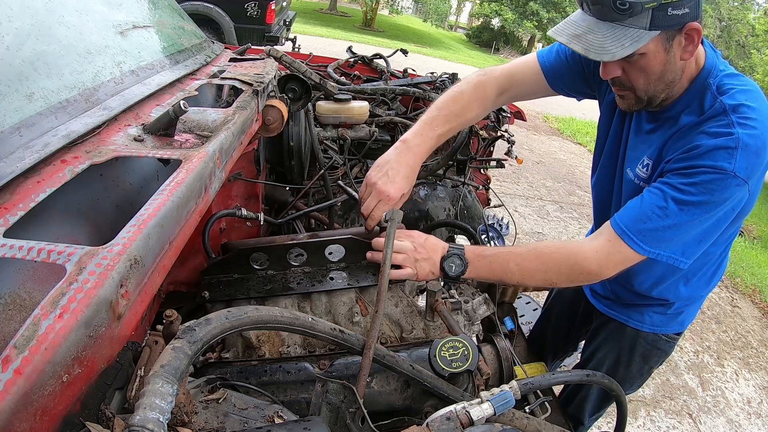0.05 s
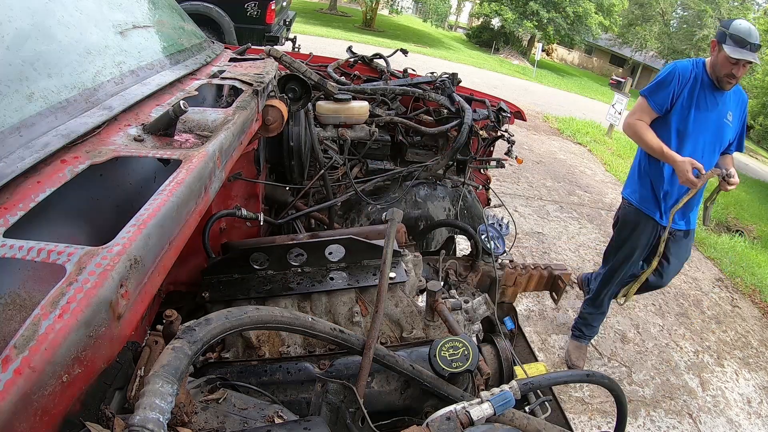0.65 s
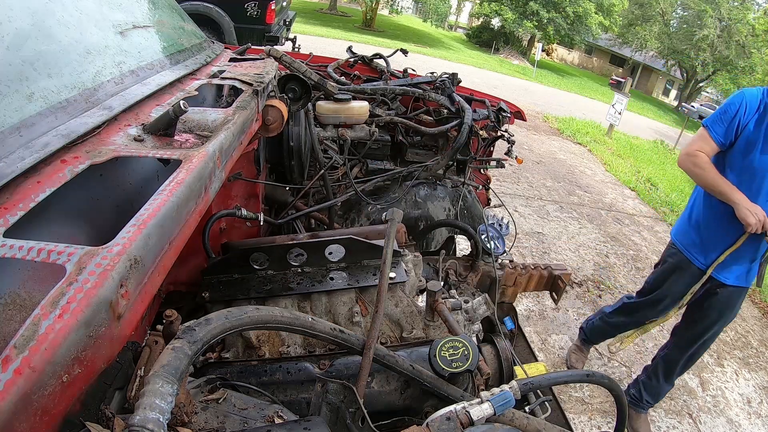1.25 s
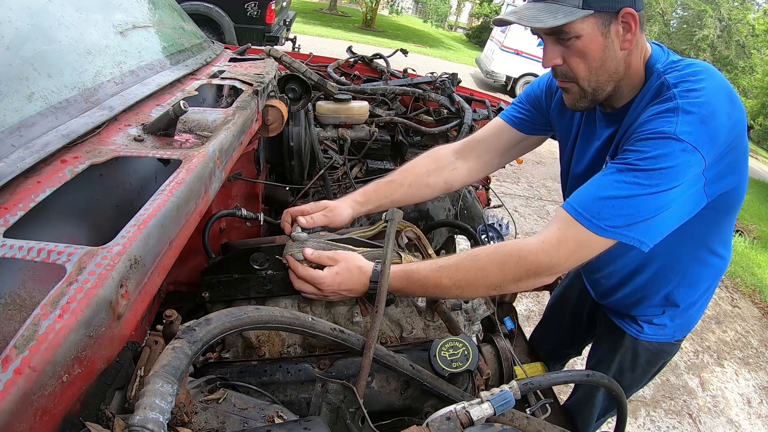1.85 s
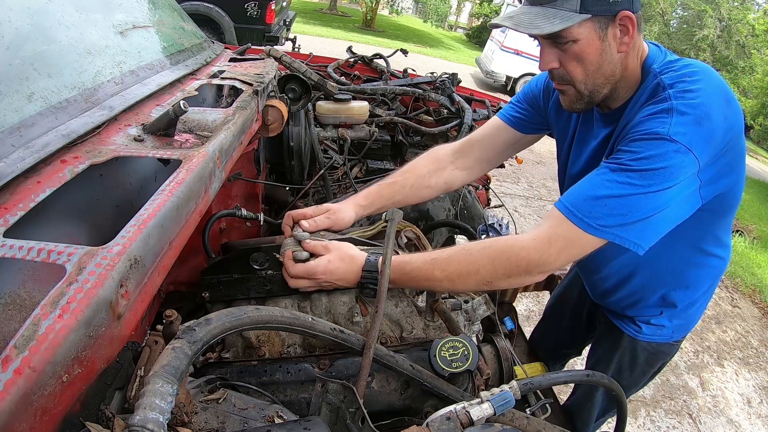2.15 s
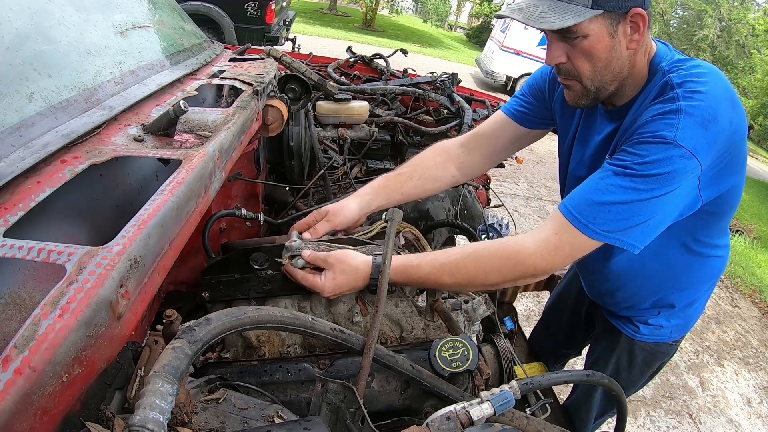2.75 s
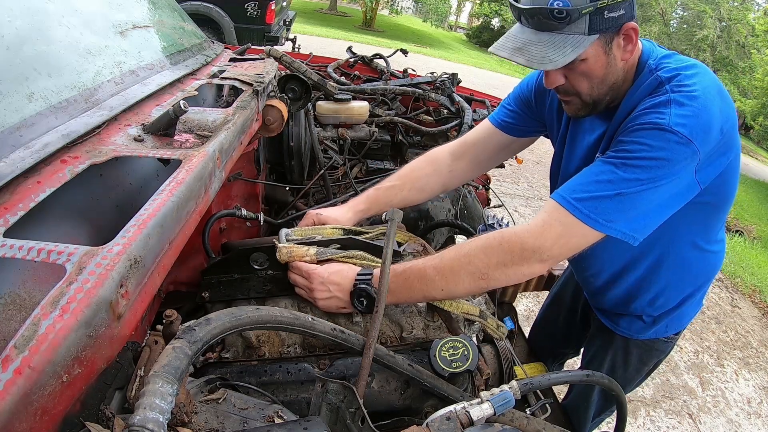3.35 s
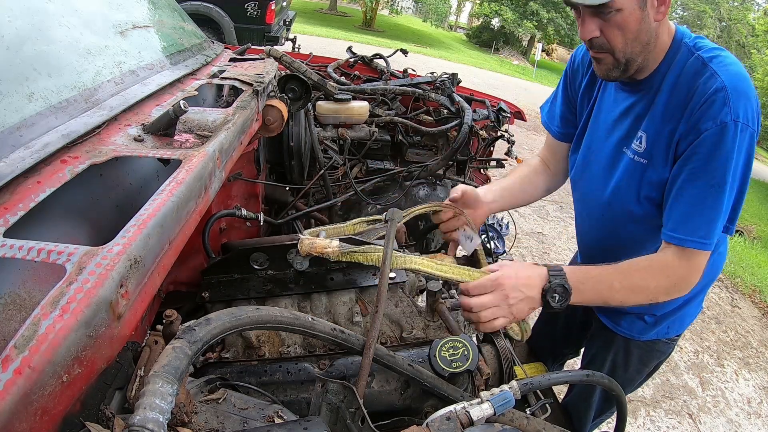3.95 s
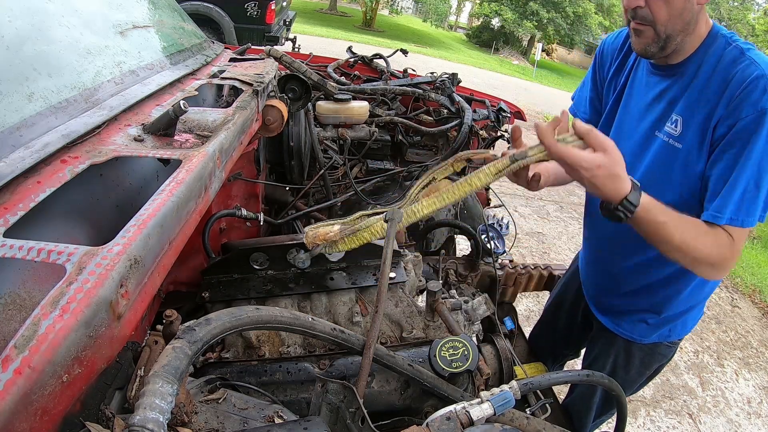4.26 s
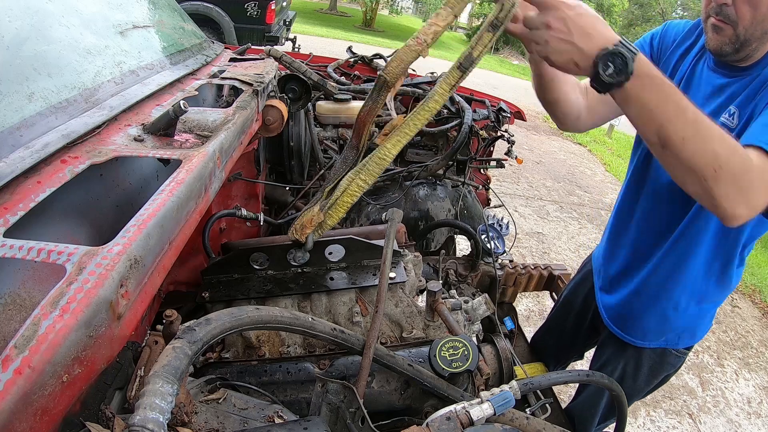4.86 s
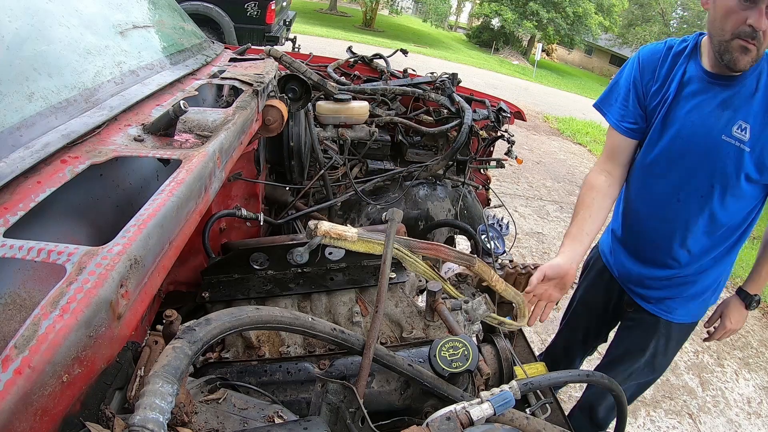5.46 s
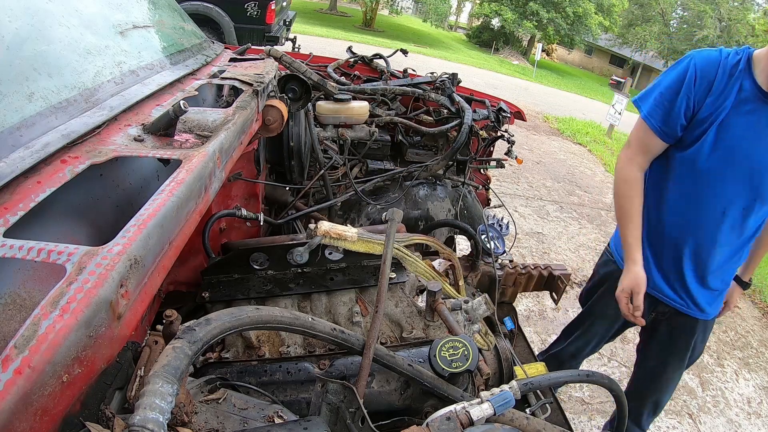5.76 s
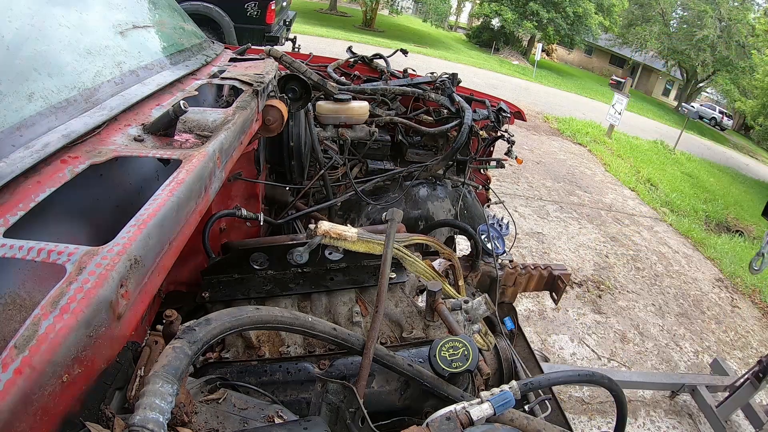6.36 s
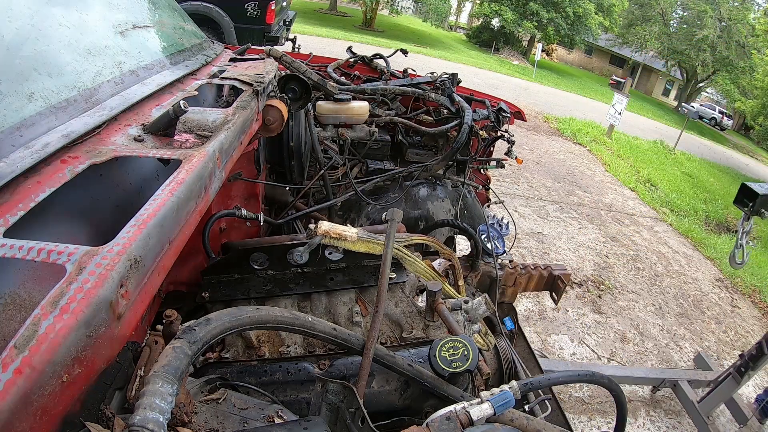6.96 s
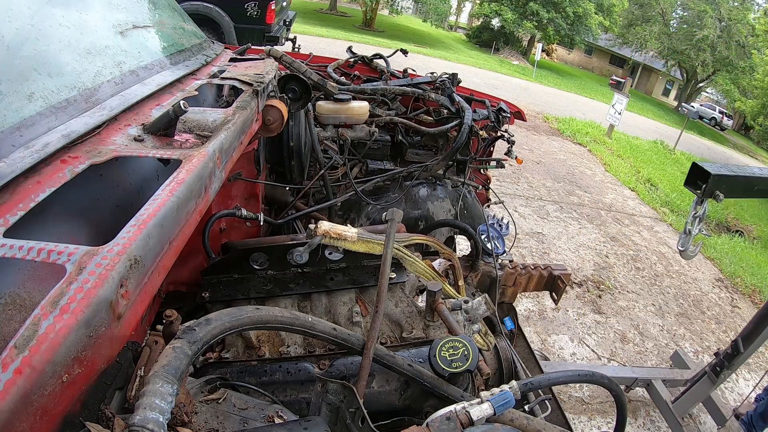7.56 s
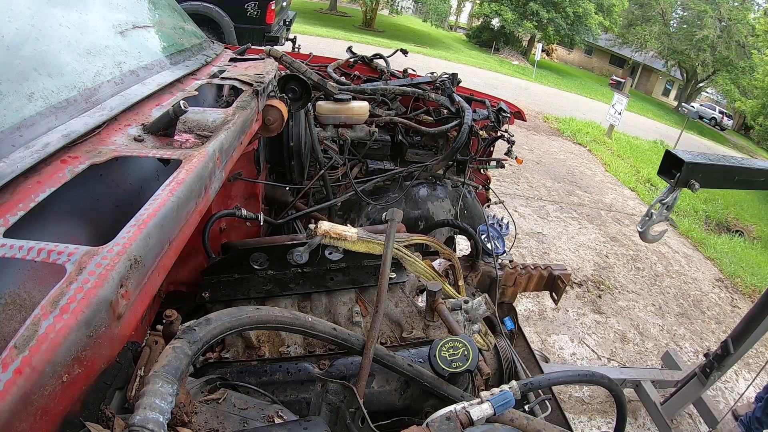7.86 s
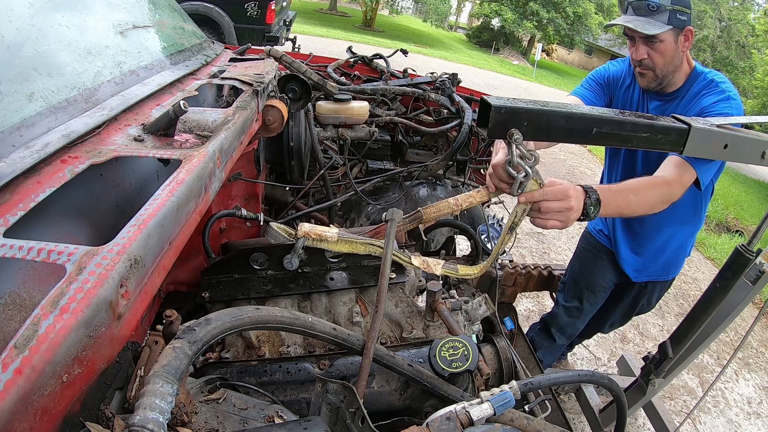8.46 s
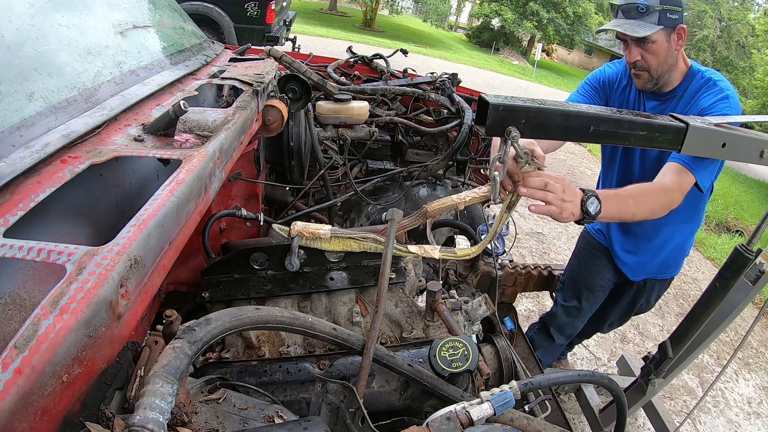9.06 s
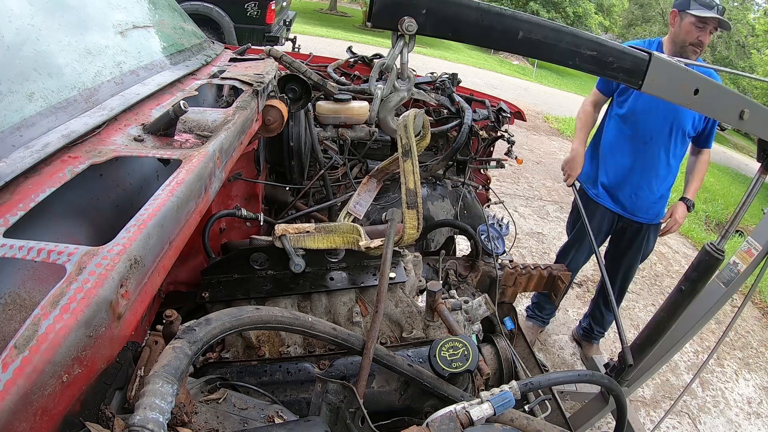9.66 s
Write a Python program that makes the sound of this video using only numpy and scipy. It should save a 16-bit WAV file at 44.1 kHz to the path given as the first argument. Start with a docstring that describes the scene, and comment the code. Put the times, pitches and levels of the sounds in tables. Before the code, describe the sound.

Outdoors, wind nudges the microphone and a motor drones far off. A steel bar clanks once. A stiff lifting strap rustles and snaps as it is threaded round a truck engine, its steel end knocking dully on the block. Then an engine hoist rolls over gritty concrete, frame rattling and chain jingling. It stops, and a shackle is hooked on with a few light clanks and scrapes.

```python
"""Outdoors, a motor drones far off and wind nudges the microphone. A steel bar clanks once. A lifting strap is
threaded round a truck engine: its webbing rustles, and a chain hook knocks on the block. From about 6.4 s the
sound of an engine hoist rolling over gritty concrete sets in abruptly, its frame rattling and its chain
jingling. It breaks off abruptly at about 8.4 s, and a shackle is hooked onto its boom with a few clanks and
scrapes."""
import sys
import numpy as np
from scipy import signal
from scipy.fft import rfft, irfft, next_fast_len
from scipy.io import wavfile
from scipy.ndimage import uniform_filter1d

SR = 44100
rng = np.random.default_rng(int(sys.argv[2]) if len(sys.argv) > 2 else 0)


def file_out(sig):
    """Save sig as 16-bit WAV at sys.argv[1]."""
    # one column per channel
    cols = np.atleast_2d(sig).T
    # limit, then scale
    lim = np.clip(cols, -1, 1)
    pcm = np.round(lim * 32767).astype(np.int16)
    wavfile.write(sys.argv[1], SR, pcm)


N = 427769
TIME = np.arange(N) / SR


def from_db(db):
    """Turn decibels into a gain."""
    return 10 ** (np.asarray(db) / 20)


def unit_level(x):
    """Scale a signal to an average (rms) level of 1."""
    return x / np.sqrt(np.mean(x ** 2) + 1e-20)


def in_time(rows):
    """Each column glides from one row's value to the next."""
    times, *columns = np.transpose(rows)
    return [np.interp(TIME, times, c) for c in columns]


def in_steps(rows, change_s=0.02):
    """Each column holds its value, then moves quickly to the next row's."""
    times, *columns = np.transpose(rows)
    row = np.maximum(np.searchsorted(times, TIME, side="right") - 1, 0)
    return [uniform_filter1d(c[row], round(change_s * SR)) for c in columns]


def swells(rows, attack_s, release_s):
    """A gain that swells up to each row's time, holds for its length and dies away."""
    power = 0
    for s, length, db in rows:
        early, late = np.maximum(s - TIME, 0), np.maximum(TIME - s - length, 0)
        fade = np.minimum((early / attack_s) ** 2 + late / release_s, 20)
        power = power + from_db(db) ** 2 * np.exp(-2 * fade)
    return np.sqrt(power)


def level_at(spectrum, hz):
    """Look up a spectrum's level in dB at a frequency."""
    points_hz, points_db = np.transpose(spectrum)
    return np.interp(np.log(hz + 1e-6), np.log(points_hz), points_db)


def colour(x, spectrum):
    """Shape a signal's lows and highs; the result has level 1."""
    size = next_fast_len(len(x))
    hz = np.arange(size // 2 + 1) * SR / size
    return unit_level(irfft(rfft(x, size) * from_db(level_at(spectrum, hz)), size)[:len(x)])


def split(x):
    """Cut a signal into half-octave bands; return their centres and the bands."""
    size = next_fast_len(len(x))
    centres = 180 * 2 ** (np.arange(14)[:, None] / 2)
    hz = np.clip(np.arange(size // 2 + 1) * SR / size, centres[0], centres[-1])
    shares = np.maximum(1 - 2 * np.abs(np.log2(hz / centres)), 0)
    return centres, irfft(rfft(x, size) * shares, size)[:, :len(x)]


def noise(spectrum):
    """Steady noise with the given spectrum."""
    return colour(rng.standard_normal(N), spectrum)


def drift(per_s):
    """A random wobble that changes about per_s times a second."""
    knots = rng.standard_normal(4000)
    return unit_level(np.interp(TIME * per_s, np.arange(len(knots)), knots))


def grains(per_s, spread_db):
    """Tiny slips at random moments, some larger than the rest."""
    sizes = from_db(spread_db * np.minimum(rng.exponential(1, N), 4))
    return unit_level(sizes * rng.choice([-1, 1], N) * (rng.random(N) < per_s / SR))


def ring(force, tones, wander_db=0):
    """A force rings an object's tones, each fading 60 dB in its ring time (t60)."""
    out = 0
    for hz, db, t60 in tones:
        decay, angle = from_db(-60 / (t60 * SR)), 2 * np.pi * hz / SR
        # as the contact wanders, each tone comes and goes
        drive = force * from_db(wander_db * drift(18)) if wander_db else force
        feedback = [1, -2 * decay * np.cos(angle), decay ** 2]
        out = out + signal.lfilter([0, from_db(db) * np.sin(angle)], feedback, drive)
    return unit_level(out)


def blows(hits, tones, crack, crack_db, crack_t60, damping, rise_s, scatter_db=1.5, detune=0.0013):
    """Each blow rings the tones over a crack: a burst of dense overtones whose treble dies first."""
    t = np.arange(SR // 2) / SR
    hz, tone_db, t60 = np.transpose(tones)[:, :, None]
    centres, bands = split(colour(rng.standard_normal(2 * SR), crack))
    band_t60 = crack_t60 * (centres / 2000) ** -damping
    band_fade = from_db(crack_db - 60 * t / band_t60)
    tone_fade = from_db(tone_db - 60 * t / t60) / np.linalg.norm(from_db(tone_db))
    out = np.zeros(N + len(t))
    for s, peak_db, *hardness in hits:
        tilt = hardness[0] if hardness else 0  # harder blows are brighter
        strength = from_db(scatter_db * rng.standard_normal(hz.shape) + tilt * np.log2(hz / hz.mean()))
        # parts pressing on each other pull the pitches slightly
        pitch = hz * (1 + detune * rng.standard_normal(hz.shape))
        ringing = strength * tone_fade * np.sin(2 * np.pi * (pitch * t + rng.random(hz.shape)))
        start = rng.integers(len(t), SR)
        burst = bands[:, start:start + len(t)] * band_fade * from_db(tilt * np.log2(centres / hz.mean()))
        blow = (ringing.sum(axis=0) + burst.sum(axis=0)) * (1 - np.exp(-t / rise_s))
        at = round(s * SR)
        out[at:at + len(t)] += blow * from_db(peak_db) / np.abs(blow).max()
    return out[:N]


def hum(speed, harmonics, waver, flutter_db):
    """A motor's tones sit on whole multiples of its wavering speed."""
    turns = np.cumsum(speed * (1 + waver * drift(14))) / SR
    out = 0
    for multiple, db in harmonics:
        gain = from_db(db + flutter_db * drift(11))
        out = out + gain * np.sin(2 * np.pi * (multiple * turns + rng.random()))
    return unit_level(out)


# the background, step by step: (time [s], motor speed [turns/s], motor [dB], hush [dB], wind [dB])
SURROUNDINGS = [(0, 32, -55.5, -56.5, -51.5), (.457, 29.2, -60.5, -57.5, -24.5),
                (1.858, 28.4, -40, -53.5, -27), (3.0, 30.5, -64, -52.5, -38), (4.75, 30.1, -64, -56, -41),
                (6.06, 30.2, -59, -53.5, -67), (8.364, 30.8, -55.5, -53, -51.5)]
# spectra of the hush, the slow wind and the puffs: (frequency [Hz], level [dB])
HUSH = [(24, -24), (40, -8), (85, -13.5), (124, -10.5), (283, -23.5), (433, -30), (1070, -31),
        (1410, -32.5), (2000, -35), (2260, -36.5), (2630, -37), (16000, -52)]
GUSTS = [(2, -1), (5, 2), (10, -11), (20, -22), (40, -30.5), (80, -60), (200, -83.5)]
PUFF_RUMBLE = [(8, 3), (24, 10), (45, -11), (70, -8), (110, -28), (250, -76)]
# puffs of wind: (time [s], length [s], level [dB])
PUFFS = [(0.645, 0.07, -34), (0.9, 0.054, -38)]
# two soft, low pops where the background changes abruptly: (time [s], level [dB])
POPS = [(0.4567, -22), (1.858, -25)]


def open_air():
    """Over an outdoor hush, wind presses on the microphone; two soft, low pops are heard."""
    _, _, hush_db, wind_db = in_steps(SURROUNDINGS)
    pops = sum(from_db(db) * (TIME >= s) * np.exp(-np.abs(TIME - s) / 0.0061) for s, db in POPS)
    puffs = noise(PUFF_RUMBLE) * swells(PUFFS, attack_s=0.033, release_s=0.05)
    return from_db(hush_db) * noise(HUSH) + from_db(wind_db) * noise(GUSTS) + puffs + pops


# the motor's tones: (multiple of its speed, level [dB])
MOTOR_TONES = [(2, -7), (3, -4.5), (4, 1.5), (5, -16), (7, -15), (11, -13), (21, -24), (22, -23.5)]
# its rushing noise: (frequency [Hz], level [dB])
MOTOR_RUSH = [(29, -43), (50, -11), (117, -12), (169, -11), (279, -16.5), (320, -11.5), (376, -21),
              (609, -24), (766, -27.5), (2500, -35.5), (2930, -30), (3400, -34.5), (12000, -57),
              (15600, -78.5)]


def far_motor():
    """A far motor hums, with a rush that follows its level."""
    speed, level_db, _, _ = in_steps(SURROUNDINGS)
    tones = hum(speed, MOTOR_TONES, waver=0.00594, flutter_db=0.5)
    return from_db(level_db) * (tones + from_db(-9.5) * noise(MOTOR_RUSH))


# the sinking drone: (time [s], pitch [Hz], level [dB])
DRONE = [(2.98, 81, -84), (3.01, 80.8, -53), (3.55, 80.5, -53.5), (3.95, 70.5, -53), (4.55, 70.8, -53),
         (5.0, 60.8, -67), (5.5, 59.6, -72)]
# its tones: (multiple of its pitch, level [dB])
DRONE_TONES = [(1, -3.5), (2, -1), (4, -9), (5, -10)]
# what the exhaust pipe lets through: (frequency [Hz], level [dB])
EXHAUST = [(70, 1), (145, 0), (180, -16), (280, -11), (325, -0.5), (352, 0.5), (390, -12), (600, -22)]


def road_drone():
    """A drone from the road sinks in pitch, coloured by an exhaust pipe."""
    hz, level_db = in_time(DRONE)
    return from_db(level_db) * colour(hum(hz, DRONE_TONES, waver=0.00527, flutter_db=3.5), EXHAUST)


# pulls through the hands: (time [s], length [s], level [dB])
PULLS = [(1.1, 0.11, -65.5), (2.118, 0.03, -55), (2.26, 0.13, -64), (3.36, 0.065, -63), (3.835, 0.025, -60),
         (3.955, 0.038, -54), (4.22, 0.2, -59.5), (5.215, 0.026, -61)]
# snags: (time [s], level [dB], brightness [dB/octave])
SNAGS = [(1.013, -46, -1), (1.099, -46.5, -4.5), (1.446, -44, 11), (1.715, -45.5, -4), (1.961, -41.5, -3),
         (2.116, -36, -5), (2.233, -36.5, -3), (2.992, -40.5, -7), (3.431, -40.5, 7), (3.926, -35.5, 3.5),
         (3.968, -33.5, 2.5), (4.228, -38, 3), (4.306, -34.5, -3), (4.477, -38, 4.5), (4.787, -40, 10),
         (8.731, -37.5, 1), (9.595, -43.5, 12), (9.665, -44, 9)]
# the webbing's rasp: (frequency [Hz], level [dB])
WEBBING = [(600, -14), (1800, -4), (3800, 4), (6000, -3), (8500, -1), (11000, -9.5), (16000, -14.5)]
# taps of the buckle: (time [s], relative level [dB])
BUCKLE_HITS = [(0.4723, -42), (0.4984, -36), (0.5444, -45.5), (1.715, -52)]
# its tones: (pitch [Hz], level [dB], ring time [s])
BUCKLE = [(4820, 2.5, 0.078), (5660, 5, 0.062), (6700, 5, 0.079), (12360, -10, 0.084)]


def strap():
    """Stiff webbing rasps with each pull and snaps where it snags; its buckle tinkles."""
    pulling = swells(PULLS, attack_s=0.015, release_s=0.026)
    fibres = grains(per_s=900, spread_db=4.0)
    rasp = colour(fibres, WEBBING) * pulling * from_db(3.1 * drift(60))
    snags = blows(SNAGS, BUCKLE, WEBBING, crack_db=12, crack_t60=0.035, damping=0.33, rise_s=0.0001)
    buckle = blows(BUCKLE_HITS, BUCKLE, WEBBING,
                   crack_db=-2, crack_t60=0.021, damping=0.2, rise_s=0.00052)
    return rasp + snags + from_db(0.7) * buckle


# blows on bar and block: (time [s], level [dB], brightness [dB/octave])
BAR_HITS = [(0.372, -21, 0.0)]
BLOCK_HITS = [(2.690, -27.5, -0.5), (2.839, -35, 3), (3.613, -42, -3), (3.638, -37.5, 1),
              (4.045, -18.5, 1.5), (4.185, -42, -3), (4.480, -47.5, -7), (4.820, -39.5, -4),
              (4.978, -28.5, -2.5), (5.098, -39.5, -6.5), (5.245, -20, -2.5), (5.783, -47.5, 5)]
# their tones: (pitch [Hz], level [dB], ring time [s])
BAR = [(1250, -2, 0.13), (1460, -10, 0.14), (1640, 2, 0.2), (1930, -6, 0.2), (2150, -1, .06),
       (2300, -2, 0.092), (3700, 1, 0.065), (3900, 2, 0.067), (4360, -1, 0.093), (6140, -12, 0.12),
       (7500, -13, 0.18), (7790, -3, 0.076)]
BLOCK = [(374, -17.5, 0.39), (680, -7, 0.11), (893, 8, 0.07), (1010, -17, 0.37), (1144, -11.5, 0.18),
         (1297, -2.5, .15), (1500, -10, 0.069), (1707, 3, 0.067), (1862, 4, 0.046), (1975, -6, .08),
         (2070, -14, 0.17), (2255, -6.5, 0.08), (2680, -13, 0.066), (2990, -5, 0.079), (3550, -15, 0.065),
         (3800, -14, 0.073), (10860, -34, 0.091)]
# their cracks: (frequency [Hz], level [dB])
BAR_CRACK = [(180, -51), (300, -16), (433, -21), (828, -19), (1500, -6), (2200, -5.5), (4160, -16),
             (4750, -21), (7570, -18), (16000, -46)]
BLOCK_CRACK = [(200, -31), (380, -0.5), (520, -18), (880, 0.5), (1900, -1.5), (2600, -8), (4000, -19),
               (7500, -20), (15000, -49)]


def engine_knocks():
    """A steel bar clanks once; a chain hook knocks dully on the heavy engine block."""
    bar = blows(BAR_HITS, BAR, BAR_CRACK, crack_db=1, crack_t60=0.06, damping=0.18, rise_s=0.0004)
    block = blows(BLOCK_HITS, BLOCK, BLOCK_CRACK,
                  crack_db=-10.5, crack_t60=0.091, damping=0.31, rise_s=0.00049)
    return bar + block


# clinks of chain, hook and shackle: (time [s], relative level [dB])
CHAIN_HITS = [(6.2996, -50), (6.3555, -49), (6.4268, -44), (6.484, -39), (6.4931, -31), (6.5585, -31),
              (6.5805, -20.5), (6.592, -29), (6.6025, -24.5), (6.614, -28), (6.6605, -32.5), (6.833, -48),
              (7.1285, -28)]
HOOK_HITS = [(7.217, -29), (7.6036, -19.5), (8.0103, -17.5), (8.0408, -22.5), (8.3405, -27)]
SHACKLE_HITS = [(6.702, -48), (7.099, -48), (7.415, -45), (8.2117, -44), (8.7329, -47), (8.8212, -24),
                (8.8931, -38), (8.9391, -48)]
# their tones: (pitch [Hz], level [dB], ring time [s])
CHAIN = [(8930, -9, .09), (9030, -8, .09), (9600, -9, .06), (9760, -5, .07), (9850, -1, .08),
         (12356, -0.5, .07), (14750, -18, .05)]
HOOK = [(8000, -8, .05), (8856, -3, .06), (9300, -9, .04), (10060, -14, .04), (11230, 0, .064),
        (11340, -3, .07), (12560, -9, .06), (13780, -8, .036), (14140, -13, .06)]
SHACKLE = [(11540, 0, .13), (11610, -4, .13), (11980, -12, .1), (12150, -6, .13), (12356, -17, .1),
           (12780, -12, .16)]
# the crack they share: (frequency [Hz], level [dB])
LINK_CRACK = [(1000, -6), (2500, -5), (6000, -6.5), (12000, -4), (16000, -4)]
# the whole chain shakes: (time [s], length [s], relative level [dB])
CHAIN_SHAKES = [(6.545, 0.074, -44.5)]


def lifting_tackle():
    """Chain, hook and shackle are small, hard steel parts, so they ring very high."""
    chain = blows(CHAIN_HITS, CHAIN, LINK_CRACK,
                  crack_db=-5.5, crack_t60=0.032, damping=0.26, rise_s=0.00074, scatter_db=1)
    links = grains(per_s=970, spread_db=5.5) * swells(CHAIN_SHAKES, attack_s=0.022, release_s=0.064)
    shaking = np.std(links) * (ring(links, CHAIN, wander_db=4) + from_db(-5) * colour(links, LINK_CRACK))
    hook = blows(HOOK_HITS, HOOK, LINK_CRACK, crack_db=-9, crack_t60=0.035, damping=0.27, rise_s=0.00095)
    shackle = blows(SHACKLE_HITS, SHACKLE, LINK_CRACK,
                    crack_db=-11, crack_t60=0.059, damping=0.19, rise_s=0.00034)
    return from_db(-0.5) * chain + shaking + from_db(-2) * hook + from_db(3) * shackle


# blows on the boom: (time [s], level [dB], brightness [dB/octave])
BOOM_HITS = [(8.408, -29.5, 4.5), (8.420, -29, 5), (8.750, -35.5, -2.5), (8.881, -32, -0.5),
             (8.945, -42, 3), (9.163, -37, -2.2), (9.226, -42.5, -3.5), (9.591, -44.5, -4),
             (9.648, -44, -3)]
# its tones: (pitch [Hz], level [dB], ring time [s])
BOOM = [(760, -12, 0.12), (865, -7.5, 0.17), (1413, -0.5, 0.18), (1694, -4, 0.061), (2222, -1.5, 0.18),
        (2307, -3, 0.17), (2880, -1.5, 0.16), (3156, -2.5, 0.15), (3410, -7, 0.089), (3635, -5, 0.13),
        (4300, -17, 0.11), (4870, -7, 0.073)]
# its crack and scrape: (frequency [Hz], level [dB])
BOOM_CRACK = [(500, -12), (1300, -3), (2700, -1), (4500, -4.5), (7000, -13.5), (14000, -32)]
# scrapes: (time [s], length [s], level [dB])
SCRAPES = [(8.665, 0.035, -59.5), (8.755, 0.025, -55.5), (8.83, 0.07, -55), (8.95, 0.027, -57)]


def boom():
    """The hoist's lifting arm clanks, and something scrapes briefly against it."""
    clanks = blows(BOOM_HITS, BOOM, BOOM_CRACK, crack_db=-3.5, crack_t60=0.11,
                   damping=0.061, rise_s=0.0007, scatter_db=3.5, detune=0.0057)
    slips = grains(per_s=1500, spread_db=3.5)
    return clanks + colour(slips, BOOM_CRACK) * swells(SCRAPES, attack_s=0.028, release_s=0.024)


# a wheel swivels: (time [s], length [s], level [dB])
SWIVELS = [(6.548, 0.077, -34.5), (6.838, .01, -49), (8.005, 0.023, -40.5), (8.32, 0.023, -39)]
# spectra of crushing, swivelling and rolling: (frequency [Hz], level [dB])
GRIT = [(3000, -4), (6000, 7), (8500, 10.5), (10500, 3), (13500, -2), (16000, -10)]
GRIND = [(150, -21), (340, 4.5), (520, -11.5), (800, -9), (1250, 2), (1700, -2.5), (2500, -10), (5000, -26),
         (12000, -52)]
RUMBLE = [(25, -12), (70, 1), (200, -4.5), (350, -10), (700, -51)]


def wheels(grit_gain, extra_push_db):
    """Steel wheels crush grit, grind dully as they are dragged round, and rumble."""
    grit = colour(grains(per_s=4000, spread_db=1.5), GRIT) * grit_gain
    swivelling = swells(SWIVELS, attack_s=0.018, release_s=0.038)
    grinding = colour(grains(per_s=1200, spread_db=1.0), GRIND) * swivelling
    rumble = noise(RUMBLE) * from_db(-47 + 0.46 * extra_push_db)
    return grit + grinding + rumble


# the rattle of loose parts: (frequency [Hz], level [dB])
RATTLE = [(100, -31), (220, -12), (370, 3.5), (520, 0), (760, 6), (1080, -3.5), (1400, 1.5), (3000, 1),
          (5000, -0.5), (6200, -7.5), (8800, -17), (11000, -31), (16000, -46)]


def clatter(per_s, t60, parts=28):
    """Many loose parts ping, each at its own pitch and its own moments."""
    count = round(per_s * N / SR)
    out = 0
    for hz in np.geomspace(330, 7000, parts) * rng.uniform(0.95, 1.05, parts):
        taps = np.zeros(N)
        taps[rng.integers(0, N, count)] = rng.exponential(1, count)
        gain = from_db(level_at(RATTLE, hz)) * np.sqrt(hz)  # higher bands hold more parts
        out = out + gain * ring(taps + 1e-18, [(hz, 0, t60)])
    return unit_level(out)


# clanks of the joints: (time [s], level [dB], brightness [dB/octave])
FRAME_HITS = [(6.4515, -36, 2), (6.464, -29.5, 5), (6.537, -26, -7.5), (6.693, -33.5, 4),
              (6.779, -32.5, -6), (6.8215, -28, 1), (6.941, -29.5, 1), (6.983, -23.5, 4.5),
              (7.0785, -31, -3), (7.1085, -26.5, 6), (7.184, -20, -3), (7.206, -19.5, 3), (7.272, -21, 4),
              (7.4225, -22, -1), (7.4756, -24, -2.5), (7.515, -21.5, 3.5), (7.604, -17.5, -1.5),
              (7.657, -18, 1), (7.6956, -12, 4), (7.831, -25.5, -2), (7.998, -26, -2.5), (8.1026, -29.5, 0),
              (8.170, -18.5, -0.5), (8.321, -20, -0.5)]
# tones of the frame and a loose brace: (pitch [Hz], level [dB], ring time [s])
FRAME = [(738, -7, .06), (882, -7, .1), (1662, -2, .25), (1733, 4, .15), (2082, -1, .14), (2897, -2, .16),
         (3250, 1, .12), (4025, -1, .2), (4277, 0, .16), (4302, 1, .16), (4639, -3, .12), (5177, 2, .07),
         (5676, -8, .12), (6660, -7, .1)]
BRACE = [(1754, 0, 0.24)]
# the brace rings on: (time [s], length [s], level [dB])
BRACE_BUZZ = [(6.97, 0.56, -44.5)]
JOLT_ATTACK_S, JOLT_RELEASE_S = 0.031, 0.049  # the frame takes up the shaking, then settles


def frame(rattle_db, extra_push_db, bumps_db):
    """The tube frame rattles, brighter the harder it shakes; its joints clank and a brace rings."""
    shaking = grains(per_s=2600, spread_db=0.7)
    pings = from_db(-3) * clatter(per_s=55, t60=0.06)
    tubes = from_db(-5.5) * ring(shaking, FRAME, wander_db=2.5)
    centres, bands = split(colour(shaking, RATTLE) + tubes + pings)
    # the joints touch now here, now there, so each band swells on its own
    shifting_db = 1.6 * np.array([drift(28) for _ in centres])
    brightness = 0.21 * (rattle_db + 30.5) + 0.013 * extra_push_db  # dB per octave
    tilt_db = brightness * np.log2(np.minimum(centres, 6000) / 2200)
    rattle = (bands * from_db(tilt_db + shifting_db)).sum(axis=0) * from_db(rattle_db - 4.5 + bumps_db)
    brace = ring(shaking, BRACE) * swells(BRACE_BUZZ, JOLT_ATTACK_S, JOLT_RELEASE_S)
    clanks = blows(FRAME_HITS, FRAME, RATTLE,
                   crack_db=8, crack_t60=0.18, damping=0.17, rise_s=0.0005, scatter_db=4.5)
    return rattle + brace + clanks


# how hard the hoist is pushed, as its rattle on smooth concrete: (time [s], relative level [dB])
PUSH = [(6.43, -48.5), (6.5, -39.5), (6.75, -67), (6.92, -70), (7.05, -44), (7.3, -37), (7.57, -38),
        (7.8, -34), (7.96, -43.5), (8.36, -42.5)]
# rough ground: (time [s], length [s], relative rattle level [dB], grit level [dB])
ROUGH_PATCHES = [(6.556, 0.053, -34, -59), (6.832, 0.0059, -36.5, -65), (6.99, 0.022, -34, -57),
                 (7.122, 0.034, -32, -50), (7.217, 0.015, -24, -41), (7.275, 0.053, -27, -37.5),
                 (7.519, 0.02, -33.5, -41.5), (7.664, 0.029, -26, -39), (7.748, 0.016, -31, -54),
                 (8.099, 0.023, -40, -57), (8.198, 0.045, -35, -55), (8.328, 0.02, -30.5, -48)]


def rolling_hoist(start_s=6.425, stop_s=8.364, fade_s=0.0014):
    """The push and the rough ground together drive the wheels, shake the frame and jingle the chain."""
    push_db, = in_time(PUSH)
    extra_push_db = push_db - np.mean(PUSH, axis=0)[1]
    patches = np.array(ROUGH_PATCHES)
    jolts = swells(patches[:, :3], JOLT_ATTACK_S, JOLT_RELEASE_S)
    rattle_db = 20 * np.log10(np.hypot(from_db(push_db), jolts))
    rough_grit = swells(patches[:, [0, 1, 3]], attack_s=0.024, release_s=0.029)
    smooth_grit = from_db(push_db - 19.5)
    crunch = np.hypot(smooth_grit, rough_grit)
    bumps_db = 1.07 * drift(70)
    rattle = frame(rattle_db, extra_push_db, bumps_db)
    wheel_noise = wheels(crunch * from_db(bumps_db), extra_push_db)
    nudges = grains(per_s=140, spread_db=3.0)
    jingle = ring(nudges, CHAIN + HOOK + SHACKLE, wander_db=9) * crunch * from_db(-12)
    rolling = np.interp(TIME, [start_s, start_s + fade_s, stop_s, stop_s + fade_s], [0, 1, 1, 0])
    return rolling * (rattle + wheel_noise + jingle)


def scene():
    """All the sounds meet at one microphone."""
    background = open_air() + far_motor() + road_drone()
    return (background + strap() + engine_knocks() + lifting_tackle() + boom() + rolling_hoist())[None]


def record(dry):
    """Cut the treble steeply above 15900 Hz."""
    return signal.sosfilt(signal.ellip(10, 0.1, 80, 15900, fs=SR, output="sos"), dry)


dry = scene()
out = record(dry)
file_out(out)
```